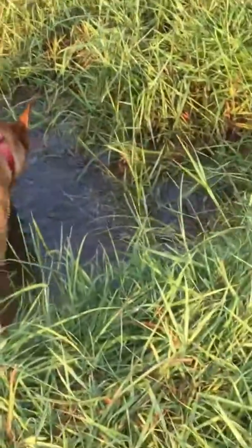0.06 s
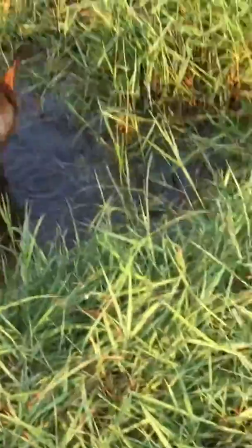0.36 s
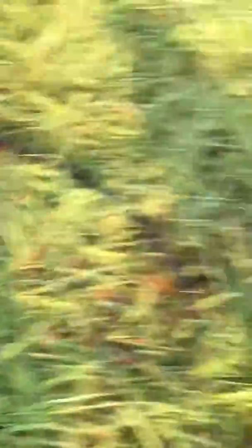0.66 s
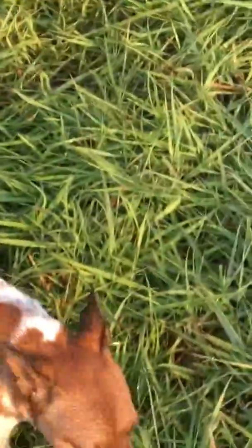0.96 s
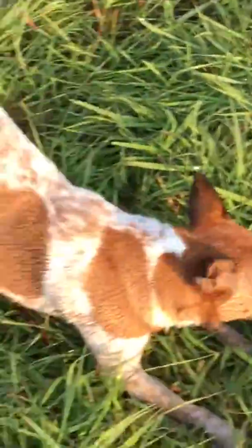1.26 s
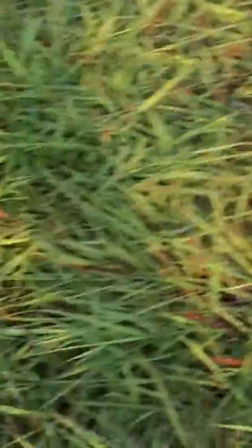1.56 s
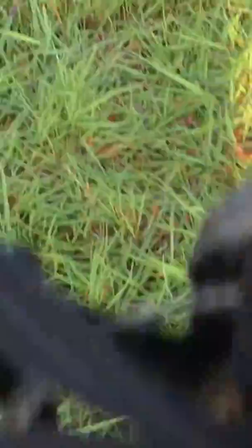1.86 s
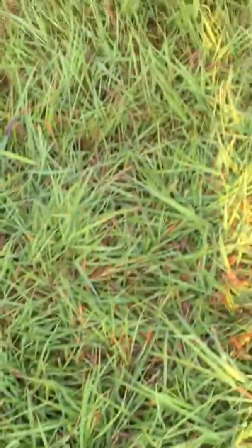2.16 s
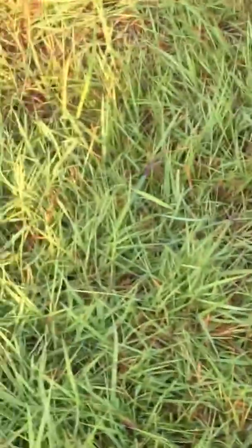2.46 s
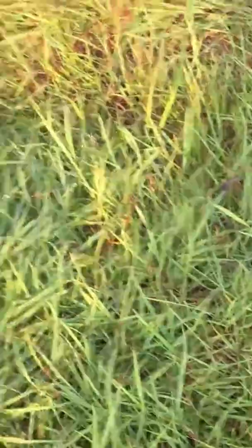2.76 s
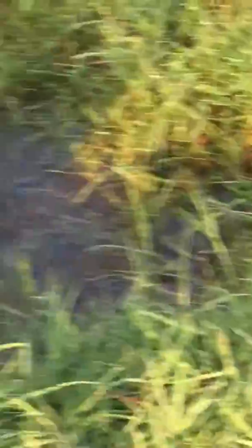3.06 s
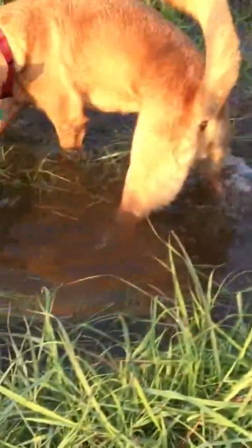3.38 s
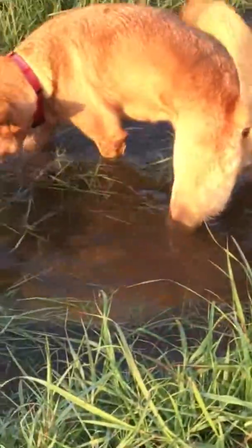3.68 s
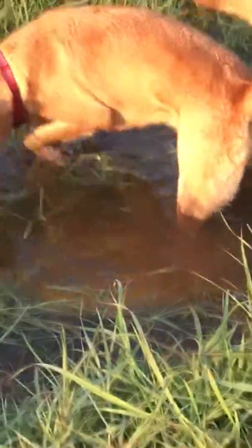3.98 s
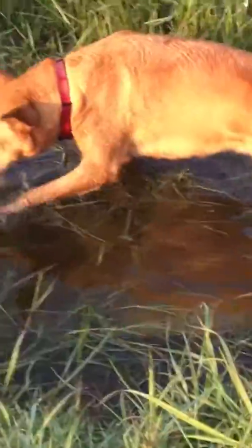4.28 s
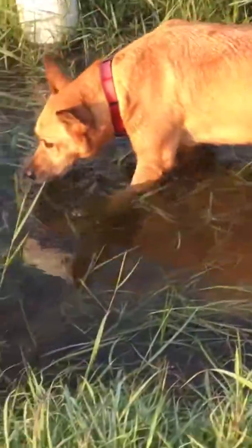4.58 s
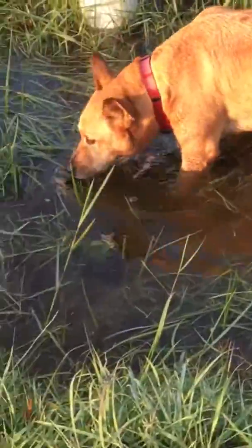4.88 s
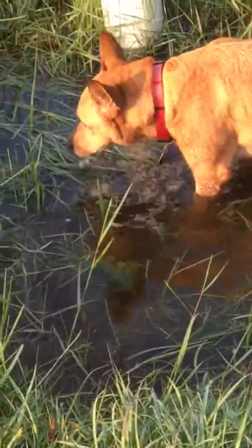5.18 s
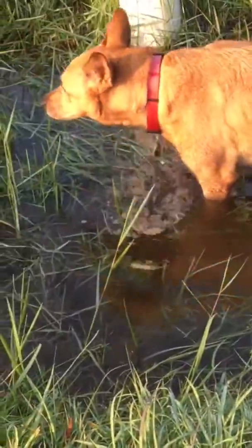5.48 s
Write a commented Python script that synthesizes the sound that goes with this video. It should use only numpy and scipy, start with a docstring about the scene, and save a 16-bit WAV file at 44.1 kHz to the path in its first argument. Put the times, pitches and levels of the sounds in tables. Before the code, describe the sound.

Close by in a grassy field, a puppy wades and paws in a muddy puddle over a steady low wind rumble. Grass rustles and faint distant bird whistles come first, then uneven little splashes with bright clinks of collar tags. The water churns most around the middle with a deep gulping step, and goes on in softer sloshes, plops and drips. A very faint insect hiss lies underneath.

```python
"""A puppy in a puddle

A puppy paws through a shallow muddy puddle in long grass. Each stroke churns the water:
trapped air bubbles ring as plops, spray ticks as it lands, and a deep step gulps.
Grass blades scrape and swish, and metal collar tags knock together and ring.
A low wind rumble, a thin hiss of insects and a few far birds lie behind."""
import sys
import numpy as np
from scipy import signal
from scipy.fft import rfft, irfft
from scipy.io import wavfile
from scipy.ndimage import uniform_filter1d

SR = 44100
rng = np.random.default_rng(int(sys.argv[2]) if len(sys.argv) > 2 else 0)


def store_wav(level_fs):
    """Save 16-bit WAV to argv[1]."""
    pcm = np.round(np.clip(np.atleast_2d(level_fs), -1, 1) * 32767)
    wavfile.write(sys.argv[1], SR, pcm.T.astype(np.int16))


N = 248314
TIME = np.arange(N) / SR

# how strong each noise is from low to high pitch: f/Hz, relative level/dB
WIND_SPECTRUM = [(15, -56), (28, -10.5), (44, -3.5), (70, 1), (105, 2.5), (140, -6), (175, -10), (250, -16),
                 (330, -25), (450, -37.5), (800, -56)]
AIR_SPECTRUM = [(200, 8), (450, 3), (1100, 2), (1700, -1.5), (2800, -12.5), (4700, -26), (7000, -24),
                (11000, -35), (16000, -35)]
GRASS_SPECTRUM = [(300, 1), (700, 3), (1800, 1.5), (3500, 0.5), (4900, -2), (6400, 2), (7600, 0), (9300, 3),
                  (10400, -0.5), (11800, 3.5), (14000, 1), (16000, -2)]
WASH_SPECTRUM = [(250, 3.5), (550, 1), (1000, -23), (1800, 3.5), (2700, -9), (3900, -3.5), (5000, -7.5),
                 (7000, -7), (12000, -51), (16000, -39)]
MIST_SPECTRUM = [(1500, -19), (3500, 6), (6000, 18), (9000, -12), (12500, 5), (16000, -36)]
SLAP_SPECTRUM = [(300, -4.5), (700, -5), (1900, -3), (3800, -5), (5200, -13), (9000, -17), (16000, -21)]
# a far hum within the rumble: t/s, f/Hz, level/dB
DRONE_PATH = [(0, 66.39, -43), (2.9, 66.3, -44.5), (3.3, 65.5, -40.5), (4.6, 65.38, -39.5),
              (5.63, 66.04, -50.5)]
# far birds' falling whistles: t/s, length/s, starting f/Hz, fall/Hz, starting level/dB
BIRD_WHISTLES = [(.005, 0.033, 2710, 90, -51.5), (.355, 0.29, 2910, 120.5, -55.5),
                 (.62, 0.074, 2840, 110, -53), (2.89, 0.223, 2890, 102, -54.5),
                 (5.335, 0.12, 3280, 570, -64.5)]
# hoarse far calls: t/s, hold/s, level/dB
BIRD_RASPS = [(.51, 0.027, -56), (.69, 0.17, -54), (.925, 0.027, -52.5)]
# legs sweeping through long grass: t/s, hold/s, relative level/dB
GRASS_SWISHES = [(0.0, 0.26, -53.5), (.37, .03, -56.5), (.455, 0.013, -49.5), (.54, 0.026, -51.5),
                 (.68, 0.012, -51.5), (.76, 0.0079, -51.5), (.825, 0.02, -49.5), (1.09, 0.13, -61),
                 (1.55, 0.042, -54.5), (1.67, 0.22, -60.5), (1.99, .02, -65), (2.17, 0.11, -58)]
# collar metal knocking together: t/s, large tag hit/dB, small tag hit/dB, ring hit/dB
TAG_CLINKS = [(1.4144, -43.5, -33.5, -48), (1.4393, -39, -47, -44), (1.4433, -44, -52, -49),
              (1.5334, -30.5, -42, -37), (1.7906, -23, -28, -25.5), (1.882, -39, -49, -45),
              (1.8956, -45, -62, -47), (2.134, -41.5, -56, -51), (2.155, -44, -60, -52),
              (2.306, -42.5, -62, -44), (2.806, -52, -55, -53), (2.8274, -60, -53, -56),
              (2.994, -54, -58, -61), (3.093, -49, -47, -59)]
# a list of tones each for large tag, small tag and ring: f/Hz, relative level/dB, time to fade 60 dB/s
TAG_TONES = [
    [(5530, -22, .085), (6400, -15, .012), (8420, -4, .035), (8600, -1, .012)],
    [(10165, -1, .05), (11500, -3, .005)],
    [(13790, -3, .045), (13900, -6, .05)],
]
# the largest drops of spray landing: t/s, relative level/dB, f/Hz, decay/s
SPRAY_DROPS = [(1.657, -36, 9500, 0.0024), (2.022, -44, 8000, 0.00087), (2.7143, -43, 6160, 0.001),
               (2.7388, -42, 4400, .0012), (3.242, -32, 11650, 0.006), (3.3006, -39.5, 8400, .0017),
               (3.345, -42, 11000, 0.0028), (4.019, -46.5, 8980, 0.0026), (4.4242, -42, 8800, 0.0029),
               (4.968, -36, 8200, 0.0023), (5.106, -42.5, 9540, 0.0017), (5.1366, -47, 5300, 0.0032)]
# sheets of water slapping back: t/s, level/dB, decay/s
WATER_SLAPS = [(1.026, -43.5, .0043), (1.076, -50, 0.0039), (1.1, -49.5, 0.016), (1.293, -41, .011),
               (1.474, -42.5, .009), (1.533, -38, .003), (1.713, -37.5, .0053), (1.742, -45.5, 0.0072),
               (1.99, -41, 0.0071), (2.324, -43.5, .0076), (2.356, -45, 0.013), (2.713, -43, .0047),
               (2.737, -40, 0.0076), (3.12, -45, .014), (4.27, -46, .0045), (4.424, -36, 0.0021),
               (4.967, -45, 0.0037), (5.059, -41, 0.0082)]
# a paw plunges and the hollow it made closes: t/s, level/dB, f/Hz
PAW_GULPS = [(1.263, -40, 344), (3.121, -34.5, 275), (4.05, -32, 257), (5.064, -45, 310)]
# the tones of that hollow: multiple of its pitch, relative level/dB
GULP_TONES = [(.63, 1.5), (1, 2.5), (1.53, -10)]
# the largest air bubbles trapped by the paws: t/s, peak level/dB, f/Hz, pitch rise/(share per s)
BUBBLE_PLOPS = [(.465, -39, 715, 41), (0.489, -39, 1150, -7), (1.074, -42.5, 1070, 66),
                (1.101, -38, 1550, -1), (1.269, -41, 410, 19), (1.281, -39.5, 540, 11),
                (1.454, -36, 813, 4), (1.717, -33, 773, 65), (1.83, -38.5, 1520, 0), (1.99, -35.5, 2100, 0),
                (2.181, -39.5, 2040, 0), (2.373, -35.5, 2170, -2), (2.65, -45, 2370, 9),
                (2.686, -43.5, 1270, 15), (2.738, -31, 3730, 4), (2.806, -39.5, 1350, 4),
                (2.911, -32, 1370, 9), (2.932, -34, 860, -3), (2.949, -33.5, 1720, 51),
                (2.963, -26, 587, 17), (3.004, -36, 1700, 56), (3.032, -41, 1780, 0), (3.088, -42, 680, 0),
                (3.118, -38, 600, 4), (3.126, -39, 1780, 8), (3.145, -38, 1920, 13), (3.192, -38, 3600, 0),
                (3.302, -39.5, 1760, 15), (4.052, -40, 2630, 3), (4.119, -34.5, 1450, 65),
                (4.221, -38, 1580, 40), (4.256, -39, 2230, 29), (4.271, -39, 3020, 69),
                (4.415, -47, 1005, 0), (4.788, -43.5, 1220, -2), (4.826, -42, 1660, 26),
                (4.859, -40, 620, 6), (4.954, -39, 2100, 0), (4.97, -37.5, 1600, 33),
                (5.018, -40.5, 700, -5), (5.026, -41.5, 940, 61), (5.046, -41, 646, 2),
                (5.061, -41, 1120, 13), (5.078, -37.5, 630, -4), (5.508, -45.5, 1660, 14)]
# paw strokes through the water: t/s, hold/s, bubbling level/dB, deep slosh level/dB
PAW_STROKES = [(1.089, 0.034, -48, -65), (1.218, 0.077, -50, -57.5), (1.379, 0.0088, -50, -67),
               (1.448, 0.06, -55, -54), (1.612, 0.025, -47.5, -66), (1.727, 0.0086, -49.5, -54),
               (1.895, 0.21, -55, -74), (2.356, 0.0086, -62, -77), (2.735, 0.013, -54.5, -75),
               (2.806, 0.11, -58, -82), (2.927, 0.036, -51.5, -48), (3.015, 0.045, -50.5, -51.5),
               (3.117, 0.046, -44.5, -47.5), (3.241, 0.0091, -50, -71), (3.315, 0.024, -52, -62.5),
               (3.421, 0.0075, -57.5, -82), (4.047, 0.13, -56, -61.5), (4.229, 0.055, -53.5, -78),
               (4.333, 0.04, -57.5, -73), (4.813, 0.088, -58, -63), (4.97, .02, -57, -57.5),
               (5.055, 0.12, -59, -64), (5.48, 0.022, -68, -82), (5.607, .03, -60, -58)]


def amp(db):
    """Turns decibels into a number to multiply a sound by."""
    return 10 ** (np.asarray(db) / 20)


def unit(x):
    """Scales a signal to an average strength (rms) of 1."""
    return x / np.sqrt(np.mean(x ** 2) + 1e-20)


def add(mix, s, sound):
    """Mixes a sound in, starting at s seconds."""
    part = mix[max(round(s * SR), 0):][:len(sound)]
    part += sound[:len(part)]


def colour(x, spectrum):
    """Shapes the lows and highs of a sound to follow a spectrum table; strength 1."""
    hz, db = np.transpose(spectrum)
    curve_db = np.interp(np.log(np.fft.rfftfreq(N, 1 / SR) + 1), np.log(hz), db)
    return unit(irfft(rfft(x) * amp(curve_db), N))


def band(centre_hz, width_hz):
    """Noise gathered around one pitch; strength 1."""
    bell = np.exp(-.5 * ((np.fft.rfftfreq(N, 1 / SR) - centre_hz) / width_hz) ** 2)
    return unit(irfft(rfft(rng.standard_normal(N)) * bell, N))


def wander(speed_hz):
    """A smooth random wobble; strength 1."""
    return band(0, speed_hz)


def crackle(per_s, spread_db):
    """Clicks at random moments, most small and a few large."""
    sizes = amp(spread_db * np.minimum(rng.exponential(1, N), 4))
    signs = rng.choice([-1, 1], N)
    return unit(sizes * signs * (rng.random(N) < per_s / SR))


def swells(rows, attack_s, release_s):
    """Loudness curve of events (t/s, hold/s, level/dB) that each swell, hold and die away."""
    power = np.zeros(N)
    for s, hold, db in rows:
        early, late = np.maximum(s - TIME, 0), np.maximum(TIME - s - hold, 0)
        power += (amp(db) * np.exp(-(early / attack_s) ** 2 - late / release_s)) ** 2
    return np.sqrt(power)


def bubble(hz, swell_s, rise):
    """A bubble swells, rings and dies; a positive rise lifts its pitch, as when it nears the surface."""
    t = np.arange(0, 9 * swell_s, 1 / SR)
    loudness = t / swell_s * np.exp(1 - t / swell_s)
    return loudness * np.sin(2 * np.pi * hz * (t + rise * t * t / 2))


def swarm(low_hz, high_hz, centre_hz, db_per_octave, per_s, spread_db, cycles):
    """Bubbles of 36 sizes, each size ringing at its own random moments, about per_s times a second."""
    out = np.zeros(N)
    for hz in np.geomspace(low_hz, high_hz, num=36):
        swell_s = cycles * rng.uniform(0.7, 1.58) / hz
        rise = rng.uniform(0, 0.124) / swell_s * min(1, 3000 / hz)
        ringing = signal.oaconvolve(crackle(per_s, spread_db), bubble(hz, swell_s, rise))[:N]
        octaves_from_centre = abs(np.log2(hz / centre_hz))
        out += amp(db_per_octave * octaves_from_centre) * unit(ringing)
    return unit(out)


def wind():
    """Wind rumbles evenly, with a far wavering hum and the soft rush of distant air."""
    s, hz, db = np.transpose(DRONE_PATH)
    pitch = np.interp(TIME, s, hz) + 1.293 * wander(2.44)
    drone = amp(np.interp(TIME, s, db)) * np.sqrt(2) * np.sin(2 * np.pi * np.cumsum(pitch) / SR)
    rumble = colour(rng.standard_normal(N), WIND_SPECTRUM)
    rumble /= np.sqrt(uniform_filter1d(rumble ** 2, size=6000))  # evens out the strength
    air = colour(rng.standard_normal(N), AIR_SPECTRUM)
    return amp(-37) * rumble + drone + amp(-58) * air


def insects():
    """Insects make a thin, high hiss that flickers slightly."""
    return amp(-64.5 + wander(27)) * band(centre_hz=8880, width_hz=426)


def birds():
    """Far birds give hoarse calls and thin, wavering whistles that fall and fade."""
    calls = swells(BIRD_RASPS, attack_s=0.039, release_s=0.021)
    out = calls * band(centre_hz=1690, width_hz=210) * amp(1.4 * wander(50))
    for s, length, hz, fall_hz, db in BIRD_WHISTLES:
        progress = np.arange(0, length, 1 / SR) / length
        n = len(progress)
        pitch = hz - fall_hz * progress + 22 * wander(74)[:n]
        tone = np.sin(2 * np.pi * np.cumsum(pitch) / SR) * signal.windows.tukey(n, .15)
        level_db = db - 5.5 * progress + 2 * wander(18)[:n]
        add(out, s, amp(level_db) * tone)
    return out


def grass():
    """Blades scrape past each other: a dense crackle that comes in uneven strokes."""
    scrape = crackle(per_s=7000, spread_db=2.9) + 0.72 * rng.standard_normal(N)
    uneven = amp(4.0 + 1.5 * wander(30))
    strokes = swells(GRASS_SWISHES, attack_s=0.032, release_s=0.068)
    return uneven * strokes * colour(scrape, GRASS_SPECTRUM)


def collar_tags():
    """Three bits of thin metal knock together: a sharp click, then each rings as hard as it was hit."""
    out, t = np.zeros(N), np.arange(0, .12, 1 / SR)
    click_band = signal.butter(2, [6500, 14000], "band", fs=SR, output="sos")
    for s, *hits_db in TAG_CLINKS:
        for hit_db, tones in zip(hits_db, TAG_TONES):
            for hz, db, fade_s in tones:
                fade = np.exp(-np.log(1000) * t / fade_s)
                add(out, s, amp(hit_db + db) * fade * np.sin(2 * np.pi * hz * t))
        burst = rng.standard_normal(len(t)) * np.exp(-t / 0.00012)
        click = signal.sosfilt(click_band, burst) + 0.24 * burst
        add(out, s, amp(hits_db[0] + 14) * click)  # follows the hit on the large tag
    return out


def drops():
    """Each landing drop gives a sharp tick and rings a tiny bubble."""
    out, t = np.zeros(N), np.arange(0, .03, 1 / SR)
    for s, db, hz, decay in SPRAY_DROPS:
        edges_hz = np.clip([hz / 1.7, hz * 1.32], 500, 18000)
        tick_band = signal.butter(2, edges_hz, "band", fs=SR, output="sos")
        tick = signal.sosfilt(tick_band, rng.standard_normal(len(t))) * np.exp(-t / decay)
        ping = 0.57 * np.sin(2 * np.pi * hz * t) * np.exp(-t / 0.0023)
        sound = tick + ping
        add(out, s, amp(db + 5.5) * sound / abs(sound).max())
    return out


def slaps():
    """Sheets of water fall back, each with a short burst of noise."""
    loudness, t = np.zeros(N), np.arange(0, .1, 1 / SR)
    onset = 1 - np.exp(-t / 0.0004)
    for s, db, decay in WATER_SLAPS:
        add(loudness, s, amp(db) * onset * np.exp(-t / decay))
    return loudness * colour(rng.standard_normal(N), SLAP_SPECTRUM)


def gulps(swell_cycles=1.26):
    """The hollow behind a plunging paw closes and rings with a few low tones."""
    out = np.zeros(N)
    for s, db, pitch in PAW_GULPS:
        for multiple, tone_db in GULP_TONES:
            hz = pitch * multiple
            add(out, s, amp(db + tone_db) * bubble(hz, swell_cycles / hz, rise=1.9))
    return out


def plops(swell_cycles=1.7):
    """Trapped air rings as single bubbles; the large, low ones ring longer."""
    out = np.zeros(N)
    for s, db, hz, rise in BUBBLE_PLOPS:
        add(out, s, amp(db) * bubble(hz, swell_cycles / hz, rise))
    return out


def churn():
    """Paws stir up bubbles over a spattering wash, larger bubbles below and a fizzing spray above."""
    bubbles = swarm(598.3, 4366, centre_hz=1920, db_per_octave=-4.5, per_s=24, spread_db=3.5, cycles=2.55)
    deep = swarm(387, 2220, centre_hz=855, db_per_octave=1, per_s=27, spread_db=1, cycles=1.75)
    wash = colour(crackle(per_s=3000, spread_db=5.1), WASH_SPECTRUM)
    fizz = swarm(4500, 14500, centre_hz=10000, db_per_octave=-1.5, per_s=50, spread_db=3, cycles=3)
    mist = colour(crackle(per_s=1500, spread_db=7.8), MIST_SPECTRUM)
    s, hold, stir_db, slosh_db = np.transpose(PAW_STROKES)
    stir = swells(zip(s, hold, stir_db), attack_s=0.03, release_s=0.031)
    stir += amp(-71)  # the puddle never quite rests
    slosh = swells(zip(s, hold, slosh_db), attack_s=0.03, release_s=0.031)
    # each stroke throws up spray, which takes longer to settle
    spray = swells(zip(s, hold, stir_db - 13.5), attack_s=0.012, release_s=0.062)
    surface = amp(-3) * bubbles + amp(-7.5) * wash
    droplets = amp(4) * fizz + amp(-6.5) * mist
    return stir * surface + slosh * deep + spray * droplets


def outdoors(x):
    """Grass and banks scatter back a short, faint echo."""
    t = np.arange(0, .2, 1 / SR)
    tail = rng.standard_normal(len(t)) * np.exp(-t / .016) * (t > .003)
    return x + amp(-12) * signal.fftconvolve(x, tail / np.linalg.norm(tail))[:N]


def scene():
    """The field behind, grass underfoot, tags and water close by, in one channel."""
    field = wind() + insects() + birds()
    puppy = grass() + collar_tags()
    water = churn() + plops() + gulps() + slaps() + drops()
    return (field + puppy + outdoors(water))[None]


def record(dry):
    """The microphone loses the deepest bass and the recorder cuts the highest treble."""
    bass_cut = signal.butter(6, 34, "high", fs=SR, output="sos")
    treble_cut = signal.firwin(511, 15900, window=("kaiser", 9), fs=SR)
    return signal.oaconvolve(signal.sosfilt(bass_cut, dry), treble_cut[None], "same")


dry = scene()
out = record(dry)
store_wav(out)
```